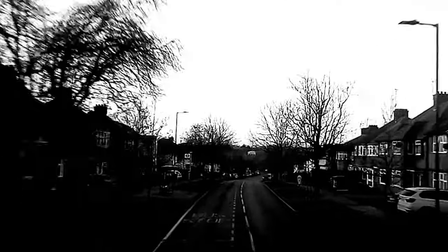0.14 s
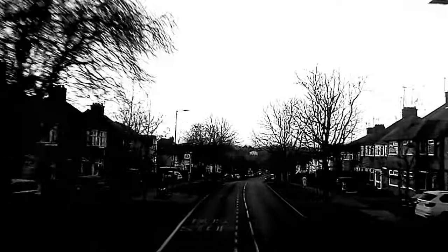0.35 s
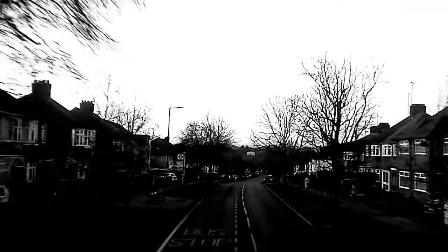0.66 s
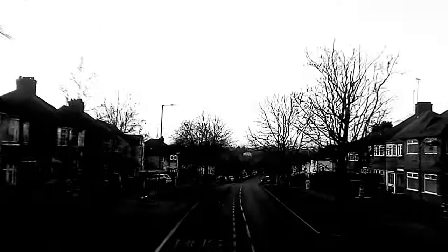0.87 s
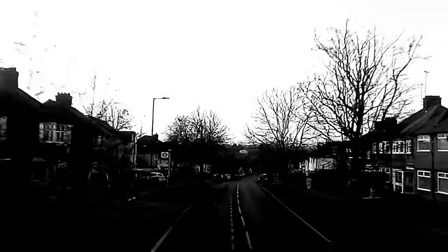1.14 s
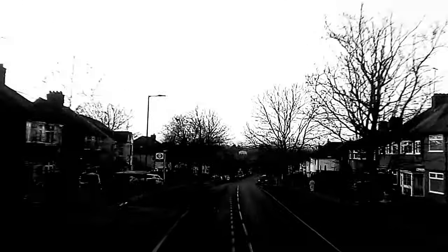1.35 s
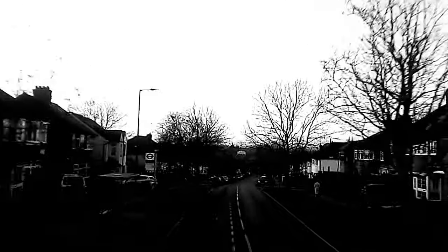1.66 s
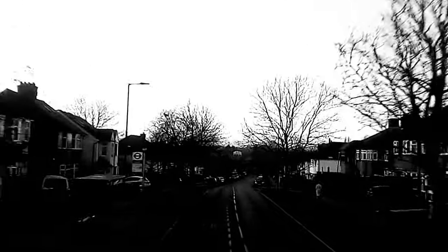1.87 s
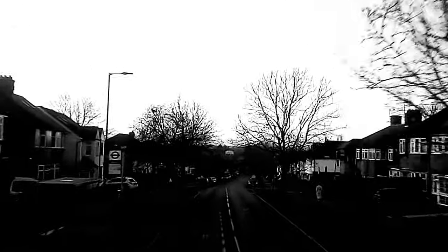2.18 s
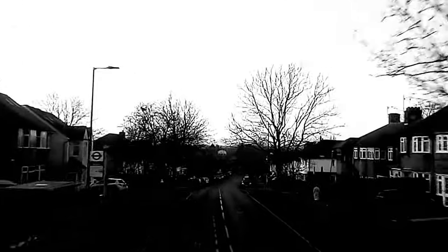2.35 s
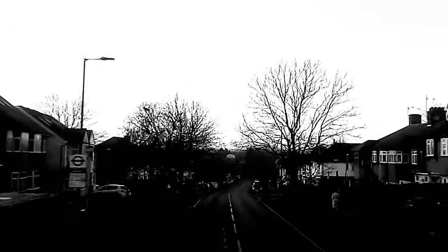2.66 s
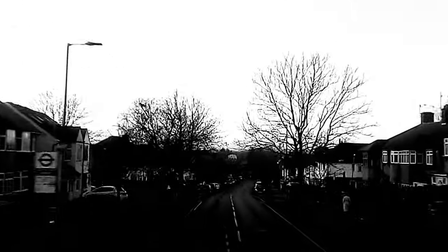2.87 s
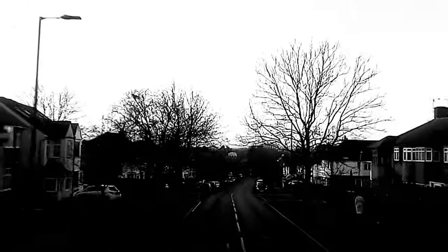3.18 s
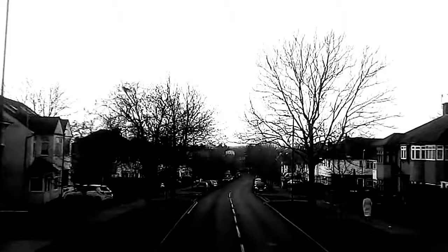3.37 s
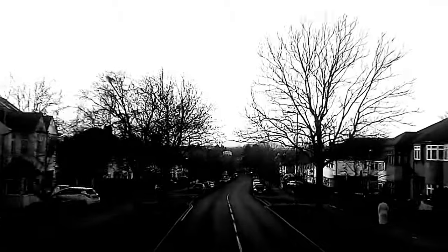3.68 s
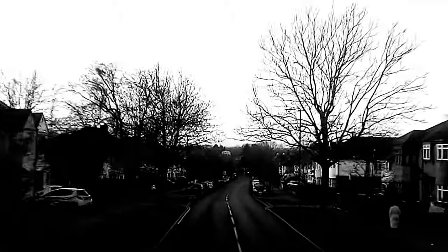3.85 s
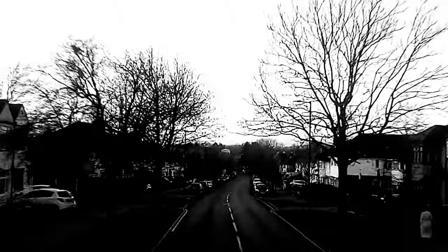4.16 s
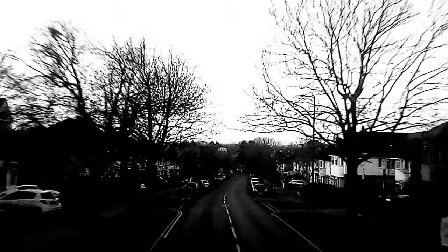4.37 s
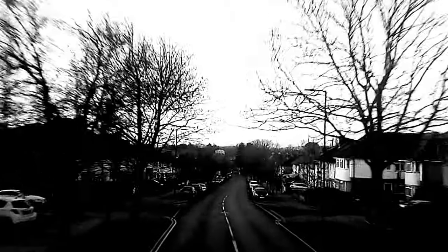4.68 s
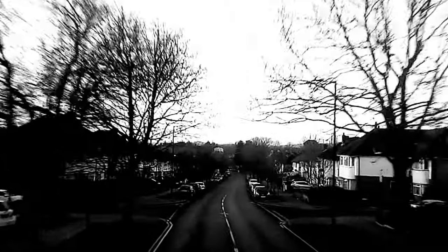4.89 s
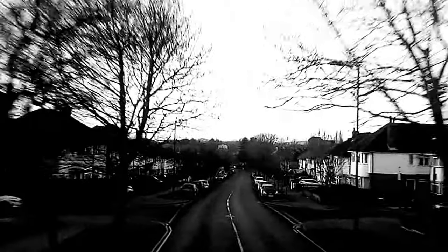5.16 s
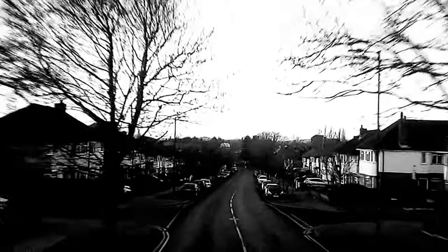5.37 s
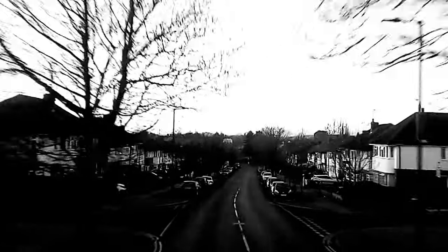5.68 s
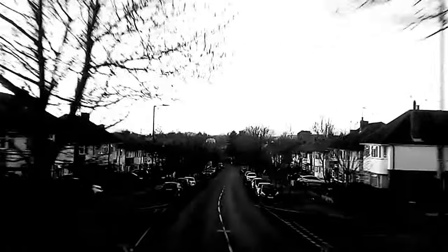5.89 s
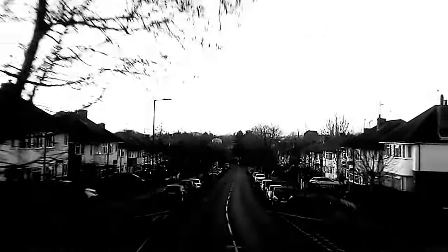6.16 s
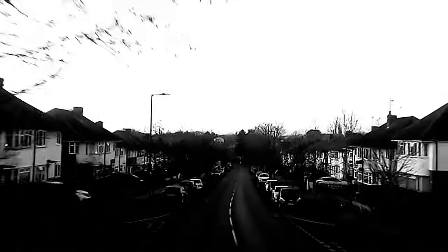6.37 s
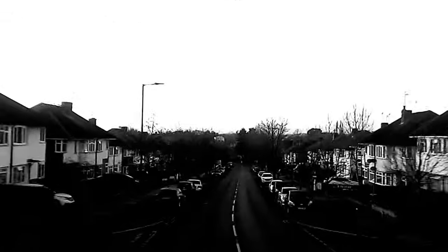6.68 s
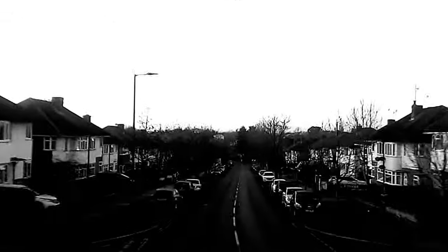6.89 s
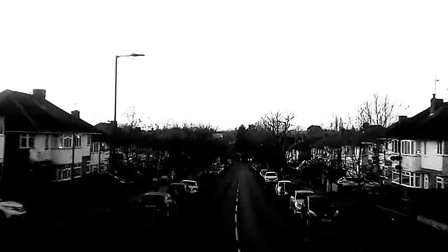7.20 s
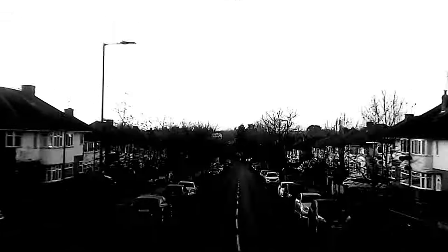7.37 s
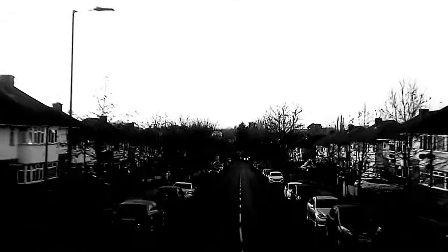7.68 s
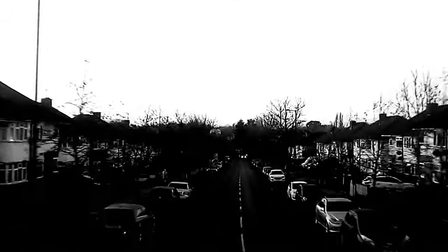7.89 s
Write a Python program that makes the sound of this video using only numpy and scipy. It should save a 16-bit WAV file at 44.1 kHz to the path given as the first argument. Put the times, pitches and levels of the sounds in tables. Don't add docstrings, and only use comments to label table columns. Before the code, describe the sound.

Inside a moving bus upstairs, a loose window pane rattles in rapid irregular bursts over a low diesel hum and rumbling road noise.

```python
import sys
import numpy as np
from scipy import signal
from scipy.fft import rfft, irfft, next_fast_len
from scipy.io import wavfile
from scipy.ndimage import uniform_filter1d, map_coordinates

SR = 44100
rng = np.random.default_rng(int(sys.argv[2]) if len(sys.argv) > 2 else 0)


def level_to_linear(level):
    exponent = np.asarray(level, float) / 20
    return 10 ** exponent


def dump_mix(stems):
    frames = np.atleast_2d(stems).T
    limited = np.clip(frames, -1, 1)
    pcm = np.round(limited * 32767).astype(np.int16)
    wavfile.write(sys.argv[1], SR, pcm)


N = 354563

# start_s, shaft_hz, load_db
ENGINE_RUN = [(0.0, 36.06, -1), (0.7, 37.4, -2.5), (1.75, 36.23, 2), (2.5, 36.47, -4), (3.0, 36.98, -1.5),
              (3.75, 37.56, 0.5), (4.25, 38.74, 0.5), (4.75, 39.84, 0.5), (5.25, 41.01, -1),
              (5.75, 42.2, 1.5), (6.0, 42.9, -0.5), (6.5, 43.3, 2), (7.0, 44.17, 2.5), (7.3, 44.28, -5.5),
              (7.7, 44.23, -2), (8.04, 44.0, -6)]
# freq_hz, t60_s
CABIN_T60 = [(300, 0.088), (1000, 0.31), (4000, 0.24), (6000, 0.2), (8000, .12)]


def unit(x):
    return x / np.sqrt(np.mean(x ** 2) + 1e-20)


def along(points, hz):
    f, v = np.transpose(points)
    return np.interp(np.log(hz + 1), np.log(f + 1), v)


def curves(rows):
    s, *cols = np.transpose(rows)
    return [np.interp(np.arange(N) / SR, s, c) for c in cols]


def wobble(rate_hz, size=N):
    knots = rng.standard_normal(int(size * rate_hz / SR) + 4)
    return map_coordinates(knots, [np.arange(size) * rate_hz / SR])


def coloured(x, spectrum):
    hz = np.fft.rfftfreq(x.shape[-1], 1 / SR)
    return irfft(rfft(x) * level_to_linear(along(spectrum, hz)), x.shape[-1])


def rush(spectrum, patchy_db):
    z = signal.stft(rng.standard_normal(next_fast_len(N + 4096)), nperseg=512)[2]
    field = uniform_filter1d(rng.standard_normal(z.shape), size=5, axis=0)
    field = uniform_filter1d(field, size=10, axis=1)
    patchy = signal.istft(z * level_to_linear(patchy_db * unit(field)), nperseg=512)[1]
    return unit(coloured(patchy, spectrum)[:N])


def tones(rows, waver, rate_hz):
    out = np.zeros(N + SR)
    for s, length_s, hz, db in rows:
        n = round(length_s * SR)
        turn = 2 * np.pi * np.cumsum(hz * (1 + waver * wobble(rate_hz, size=n))) / SR
        swell = level_to_linear(db + 2.5 * wobble(rate_hz, size=n)) * np.hanning(n) ** .4
        out[round(s * SR):][:n] += swell * np.sin(turn)
    return out[:N]


def engine():
    orders = [1, 2, 3, 7.09]
    # rms_db, floor_hz, width_hz, lift_db
    floor = [(-46, 42.7, 1.6, 13.5), (-39, 81, 4.2, 7), (-50, 129, 9, 13.5), (-60.5, 284, 12, 18)]
    shaft_hz, load_db = curves(ENGINE_RUN)
    turn = 2 * np.pi * np.cumsum(shaft_hz) / SR
    out = 0
    for k, (db, floor_hz, width_hz, lift_db) in zip(orders, floor):
        resonance = np.exp(-((k * shaft_hz - floor_hz) / width_hz) ** 4)
        level_db = db + load_db + lift_db * resonance + 1.6 * wobble(9)
        out = out + np.sqrt(2) * level_to_linear(level_db) * np.sin(k * turn + 0.2 * wobble(5))
    return out


def road():
    # start_s, roughness_db
    surface = [(0.0, -32), (0.36, -38.5), (1.1, -36), (1.23, -37.5), (1.75, -39), (2.1, -38), (2.66, -34.5),
               (2.96, -38.5), (3.38, -34.5), (3.56, -36.5), (5.17, -37), (5.71, -34.5), (6.25, -36),
               (6.67, -33), (7.37, -37), (8.04, -35)]
    # centre_s, boom_lift_db
    bumps = [
        (.78, 2.5),
        (1.92, 2),
        (2.75, 5),
        (3.76, 2),
        (4.321, 4),
        (4.79, 6),
        (5.69, 4.5),
        (6.56, 8),
        (7.19, 2.5),
        (7.95, 0.5),
    ]
    # freq_hz, density_db_per_hz
    boom_spectrum = [(12, -41), (22, -11), (45, -5), (75, -3), (110, 0), (150, -3.5), (260, -11),
                     (340, -34), (570, -120)]
    # freq_hz, density_db_per_hz
    body_spectrum = [(94, -20), (160, -2), (274, 0.5), (339, -1), (372, 2), (426, -11.5), (592, -4.5),
                     (650, -8), (840, -42), (1430, -120)]
    # freq_hz, density_db_per_hz
    whoosh_spectrum = [(260, -17.5), (450, -7.5), (570, -11.5), (700, -5), (800, -11), (1100, -17.5),
                       (1600, -26.5), (2400, -36.5), (2900, -47), (4100, -42), (5000, -50), (6500, -54),
                       (8000, -64), (11000, -100)]
    bump_s = 0.054
    rough_db, = curves(surface)
    rough_db = rough_db - rough_db.mean()
    shaft_hz = curves(ENGINE_RUN)[0]
    t = np.arange(N) / SR
    thump_db = sum(db * np.exp(-((t - s) / bump_s) ** 2) for s, db in bumps)
    speed_db = 0.46 * (shaft_hz - shaft_hz.min())
    jolt = wobble(9)
    boom_db = -37.5 + speed_db + 0.5 * rough_db + thump_db + 0.27 * jolt
    body_db = -37.5 + rough_db + 0.47 * jolt + 1.1 * wobble(12)
    whoosh_db = -42.5 + 0.91 * rough_db + 1.6 * wobble(14)
    boom = level_to_linear(boom_db) * rush(boom_spectrum, patchy_db=-0.5)
    body = level_to_linear(body_db) * rush(body_spectrum, patchy_db=0.5)
    whoosh = level_to_linear(whoosh_db) * rush(whoosh_spectrum, patchy_db=1.3)
    return boom + body + whoosh


def floor_panels():
    # start_s, length_s, pitch_hz, level_db
    panels = [
        (0, 0.78, 266, -40),
        (2.15, 0.21, 291, -39),
        (2.15, 0.23, 373, -54),
        (2.5, 0.78, 221, -40.5),
        (3.1, 0.25, 150.8, -34.5),
        (4.3, 0.46, 373, -43.5),
        (5.55, 0.388, 199.7, -36.5),
        (6.45, 0.76, 221.2, -44),
        (6.78, .3, 66.2, -31.5),
        (7.3, .7, 225, -44.5),
    ]
    return tones(panels, waver=.02, rate_hz=14.25)


def contacts():
    # first_s, last_s, first_peak_db, last_peak_db, extra_treble_db
    runs = [(0.0932, 0.3358, -33.5, -41.5, 1), (0.854, 1.1165, -40, -38, -1),
            (1.6337, 1.8867, -44, -44, 1.5), (2.329, 2.4226, -41, -35, 0), (2.5072, 2.8277, -34, -43.5, 0),
            (2.9332, 3.1966, -40, -33, 0.5), (3.2803, 3.601, -34, -44, -0.5),
            (3.697, 3.8695, -39.5, -39, 0.5), (3.9542, 4.0895, -44.5, -52, -4),
            (4.1744, 4.255, -42.5, -49.5, 2), (4.4528, 4.582, -40, -44.5, -2.5),
            (4.6603, 4.7686, -46, -45, -4), (4.9658, 5.1455, -44.5, -35.5, -2),
            (5.2345, 5.408, -38.5, -54, -2), (5.4877, 5.557, -51, -38.5, -1), (5.7294, 5.8148, -35, -34, 2),
            (5.8988, 6.1459, -36.5, -39, 0), (6.2317, 6.3162, -36.5, -38, -0.5),
            (6.4132, 6.567, -36.5, -30, 1), (6.6622, 6.7521, -34, -35, -1),
            (6.8294, 6.9202, -36.5, -37.5, -1), (6.996, 7.065, -36.5, -39, -1.5),
            (7.141, 7.22, -39, -38.5, 1.5), (7.8391, 7.9323, -36, -37, -1.5)]
    # start_s, peak_db, extra_treble_db
    singles = [(.0144, -35, 4), (.4094, -53, 4), (.5871, -58, 6), (.7043, -61, 6), (.7382, -51.5, 4),
               (1.1982, -48, 5), (1.2706, -66, 0), (2.1291, -60, 0), (4.372, -42.5, 0), (4.8304, -57, -7),
               (5.6476, -36.5, -8), (7.2938, -43, -5), (7.5108, -45.5, 2), (7.5892, -48, 5),
               (7.6106, -61, 0), (7.7494, -54, 0), (7.7894, -50, -5), (8.0077, -45, 6)]
    # blow_db, treble_db
    brightness = [(-48.5, -29), (-47, -28), (-35, -19), (-34, -16)]
    swing_s, hurry_s_per_db = .08, .0003
    rows = list(singles)
    for first_s, last_s, first_db, last_db, bright_db in runs:
        u = np.linspace(0, 1, round((last_s - first_s) / swing_s) + 1)
        late_s = hurry_s_per_db * abs(last_db - first_db) * 4 * u * (1 - u)
        start_s = first_s + (last_s - first_s) * u + late_s
        rows += zip(start_s, first_db + (last_db - first_db) * u, bright_db + 0 * u)
    s, db, bright_db = np.transpose(rows)
    scatter = rng.standard_normal((len(s), 2))
    treble_db = np.interp(db, *np.transpose(brightness)) + bright_db + .8 * scatter[:, 0]
    softness_db = np.clip(-45.5 - db, 0, 20)
    thud_db = 0.1 + .3 * softness_db + 2.8 * scatter[:, 1]
    return zip(s, db, treble_db, thud_db)


def burst(t, hz, length_s, copies):
    s, db = np.transpose(copies)[:, :, None]
    envelope = level_to_linear(db) * np.exp(-((t - s) / length_s) ** 2)
    return unit((envelope * np.sin(2 * np.pi * hz * (t - s))).sum(0))


def ringing(modes, t, in_step_s):
    hz, db = np.transpose(modes)[:, :, None]
    ring = level_to_linear(db - 60 * t / along(CABIN_T60, hz)) * np.cos(2 * np.pi * hz * (t - in_step_s))
    rise_s = 0.001 + 0.0083 * (hz > 4600) * (hz < 8000)
    return (ring * (1 - np.exp(-t / rise_s))).sum(0)


def cabin_tail(t):
    # freq_hz, density_db_per_hz
    knock_spectrum = [(240, -30), (400, -1.5), (418, -15.5), (463, -16), (505, -9), (878, -1), (987, -9),
                      (1080, -5), (1260, -13), (1380, -8.5), (2780, -21), (3770, -17), (6650, -31.5),
                      (7260, -43.5), (13000, -59)]
    hz, frames_s, z = signal.stft(rng.standard_normal(len(t)), SR, nperseg=128)
    missing = np.clip(.55 + hz[:, None] / 14000, 0, .97)
    swell = 1 - missing * np.exp(-frames_s / 0.012)
    decay = level_to_linear(-60 * frames_s / along(CABIN_T60, hz)[:, None])
    tail = signal.istft(z * swell * decay, SR, nperseg=128)[1][:len(t)]
    lumps = level_to_linear(2.6 * wobble(425.3, size=len(t)))
    tail = rfft(tail * (1 - np.exp(-t / 0.0041)) * lumps)
    even = tail / np.sqrt(uniform_filter1d(np.abs(tail) ** 2, size=70))
    return unit(coloured(irfft(even), knock_spectrum))


def pane():
    # freq_hz, level_db
    pane_modes = [(770, 0), (872, -0.5), (975, -20.5), (1044, -1), (1152, -9.5), (1217, -14.5),
                  (1418, -8.5), (1575, -24), (1779, -9), (1881, -8.5), (2342, -25.5), (2937, -22.5),
                  (3025, -24), (3416, -11), (3671, -13.5), (3789, -18.5), (3919, -24.5), (3978, -21.5),
                  (4393, -22.5), (5233, -35), (5849, -22), (6013, -19.5), (6406, -31.5), (6944, -41),
                  (7445, -39.5), (7609, -50),
                  (8350, -46.5), (9400, -56), (10200, -52.5)]
    # freq_hz, level_db
    frame_modes = [(602, -5), (690.4, 0), (306, -2.5), (225, -3)]
    # delay_s, level_db
    walls = [(0.0, 22.5), (0.0044, 18.5), (0.0056, 1.5), (0.0075, 1.5), (0.0115, -18.5), (0.0151, -13.5),
             (0.0162, -5.5), (0.0178, -11.5), (0.0223, -3.5), (0.0245, -15), (0.0255, 4.5), (0.0292, -28),
             (0.0365, -17), (0.037, -3.5)]
    # delay_s, level_db
    flutter = [(.0035, 4.5), (.0125, 6.5), (.0215, -5), (.0305, -9.5), (.038, -15)]
    # freq_hz, level_db
    glass_colour = [(1800, 0), (2050, -2.5), (2400, 6.5), (2800, 1.5), (3500, 0), (4300, -0.5), (4800, -2),
                    (6600, -1.5), (7100, -5.5), (7550, 2), (8700, -4.5), (10200, -0.5), (10900, -12),
                    (14000, -12)]
    t = np.arange(12288) / SR
    hz = np.fft.rfftfreq(len(t), 1 / SR)
    ticks = level_to_linear(-18.0) * burst(t - .0017, hz=3600, length_s=0.00047, copies=walls)
    glass = level_to_linear(-4.0) * unit(ringing(pane_modes, t, .0045)) + level_to_linear(-3.0) * cabin_tail(t)
    bounce = burst(t - .001, hz=875, length_s=.0015, copies=flutter)
    thud = level_to_linear(-9.5) * unit(ringing(frame_modes, t, 0.00461)) + level_to_linear(-7) * bounce
    edges = np.clip(t / 0.0012, 0, 1) ** 2 * np.clip((.2 - t) / .05, 0, 1)
    out = np.zeros(N + len(t))
    for s, db, treble_db, thud_db in contacts():
        tilt_db = (treble_db + 19) * np.clip(hz / 6500, 0, 1.1) ** 2 + along(glass_colour, hz)
        spot_db = 1.3 * wobble(85, size=len(hz))
        spot_db = spot_db + np.clip(hz / 3000 - 1, 0, 2) * wobble(300, size=len(hz))
        struck = glass + level_to_linear(-2.5) * cabin_tail(t) + level_to_linear(0.33 * (db + 36.5)) * ticks
        struck = irfft(rfft(struck) * level_to_linear(tilt_db + spot_db))
        fade = level_to_linear(5.5 * min(db + 37.5, 0) * t)
        blow = edges * fade * (struck + level_to_linear(thud_db) * thud)
        wait_s, rebound_db = rng.uniform([.008, -17], [.045, -8])
        blow = blow + level_to_linear(rebound_db) * np.roll(blow, round(wait_s * SR))
        out[round(s * SR):][:len(t)] += level_to_linear(db - 10.5) * blow
    return out[:N]


def trim():
    # start_s, length_s, pitch_hz, level_db
    squeaks = [(.46, 0.037, 4200, -71), (0.588, 0.028, 4950, -76), (0.657, .06, 4270, -71),
               (.73, 0.028, 2900, -67), (.76, .03, 3720, -77), (1.35, 0.048, 4250, -70),
               (1.47, 0.038, 3970, -78), (1.53, 0.094, 4200, -82), (1.594, 0.041, 4250, -76),
               (1.93, 0.11, 4200, -73), (2.031, 0.035, 2570, -63), (2.03, 0.043, 5130, -75),
               (2.038, 0.075, 4000, -72), (2.14, .07, 4330, -74), (2.207, 0.046, 4550, -75),
               (4.12, 0.047, 4210, -71), (4.24, .1, 4200, -72), (4.65, 0.078, 4020, -72),
               (4.961, 0.051, 4414, -65), (5.451, 0.072, 4250, -68), (7.36, 0.062, 4250, -71),
               (7.43, .07, 4000, -76), (7.649, 0.11, 4333, -74), (7.785, .012, 2297, -61),
               (5.598, .012, 6240, -57), (6.47, .015, 9350, -82)]
    slip_hz = 4230 + 60 * wobble(18) + 110 * wobble(400)
    thread = level_to_linear(-77 + 4 * wobble(28)) * np.sin(2 * np.pi * np.cumsum(slip_hz) / SR)
    s, life, pitch, size = rng.random((260, 4)).T
    tick_hz = 1500 * 4.6 ** pitch
    tick_db = -65 - 12 * size - 17 * pitch
    ticks = np.transpose([s * N / SR, .008 + .045 * life ** 2, tick_hz, tick_db])
    snap_s, snap_db = 5.6005, -59
    since_s = np.arange(N) / SR - snap_s
    snap_fade = level_to_linear(snap_db - 60 * np.abs(since_s) / .012) * (since_s > 0)
    snap = snap_fade * np.diff(rng.standard_normal(N + 1))
    squeal = tones(squeaks, waver=0.016, rate_hz=40)
    return squeal + snap + thread + tones(ticks, waver=0.0085, rate_hz=49)


def scene():
    return (engine() + road() + floor_panels() + pane() + trim())[None]


def top_cut(x):
    return signal.sosfilt(signal.butter(12, 16870, fs=SR, output="sos"), x)


def record(dry):
    # freq_hz, density_db_per_hz
    hiss_spectrum = [(4120, -39), (7000, -6), (8260, -14), (8960, -10), (9550, -11), (10800, -9.5),
                     (13400, -13), (14700, 0.5), (15700, -4)]
    whine_hz, whine_db, hiss_db, top_hz = 12897, -100, -78.5, 15760
    whine = level_to_linear(whine_db) * np.sin(2 * np.pi * whine_hz * np.arange(N) / SR)
    heard = dry + level_to_linear(hiss_db) * rush(hiss_spectrum, patchy_db=0.5) + whine
    mirrored = np.hstack([heard, heard[:, ::-1]])
    heard = coloured(mirrored, [(top_hz - 40, 0), (top_hz + 40, -40)])[:, :N]
    return top_cut(heard)


dry = scene()
out = record(dry)
dump_mix(out)
```